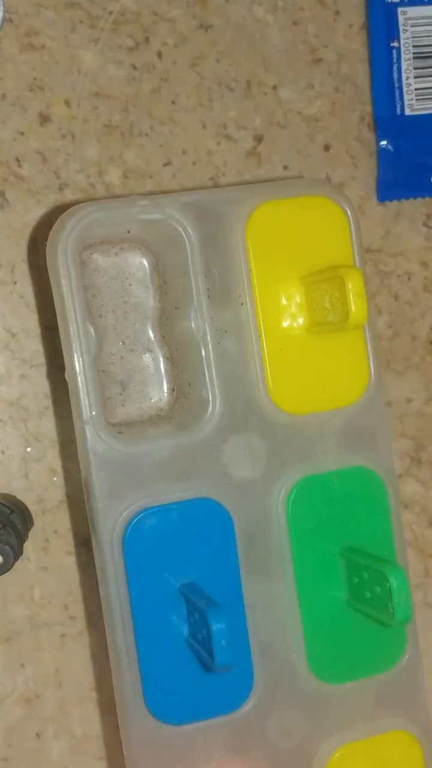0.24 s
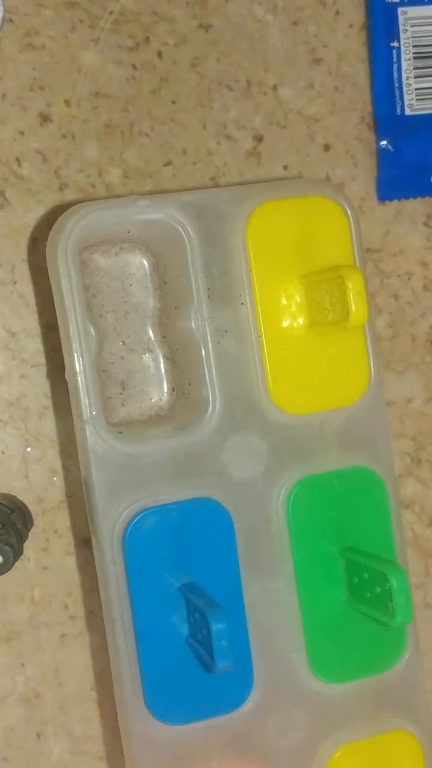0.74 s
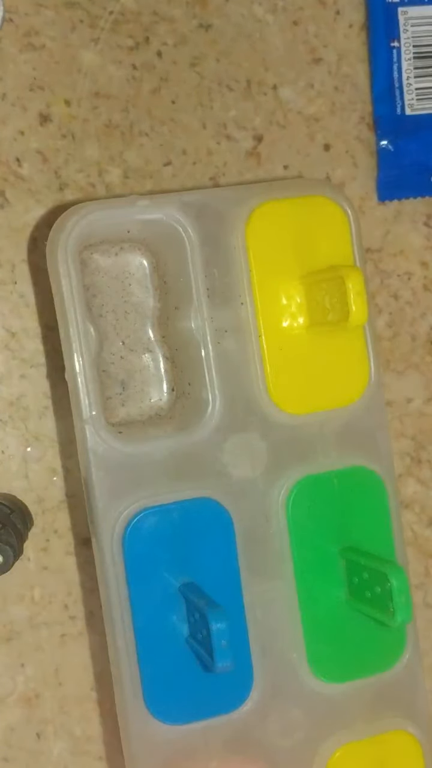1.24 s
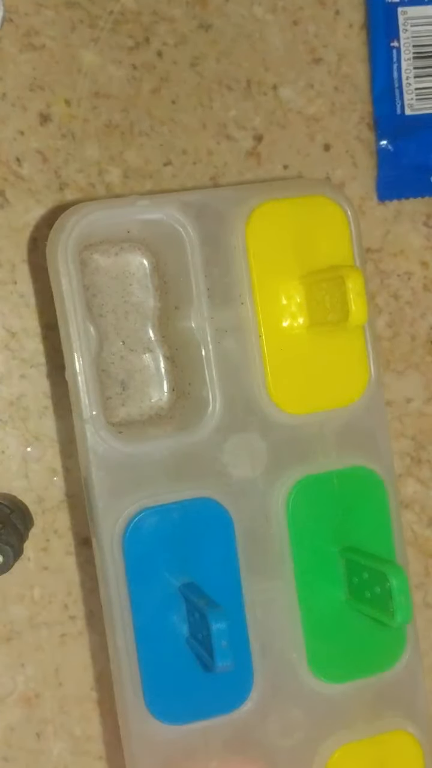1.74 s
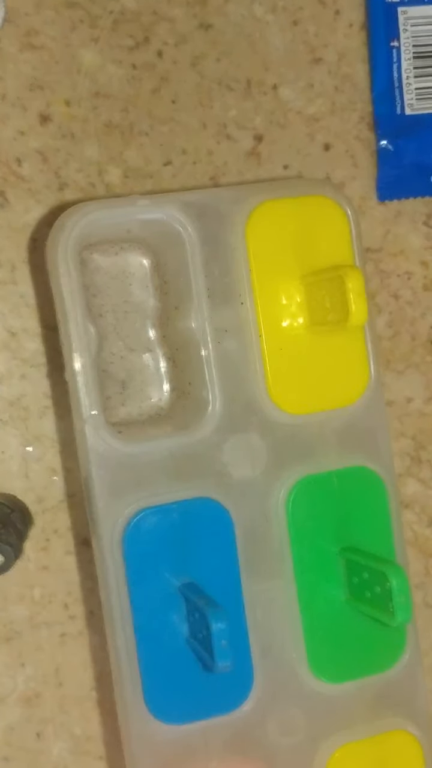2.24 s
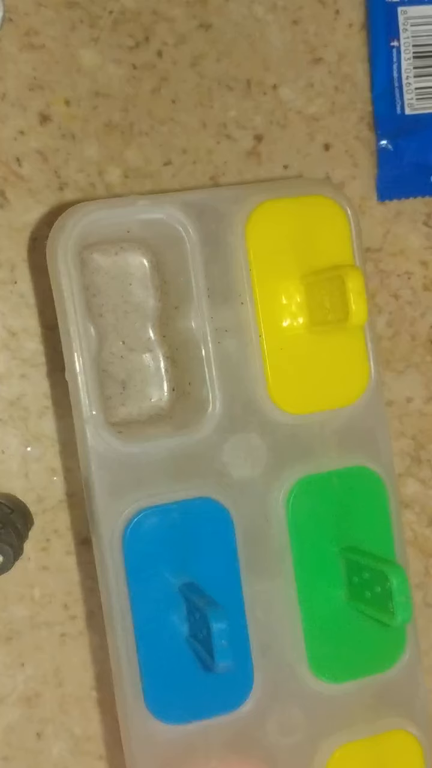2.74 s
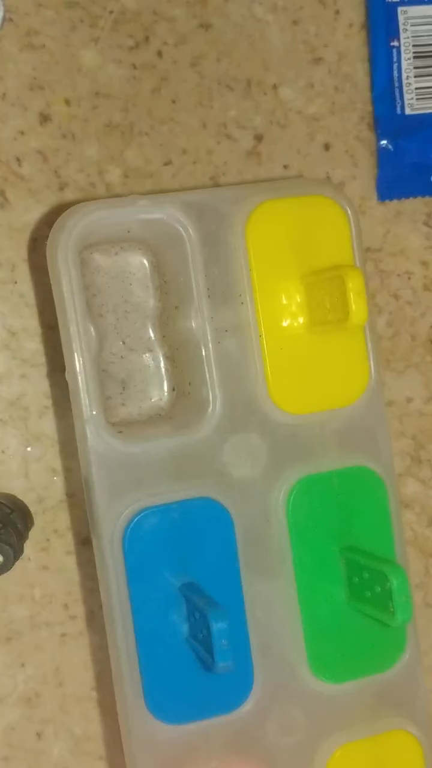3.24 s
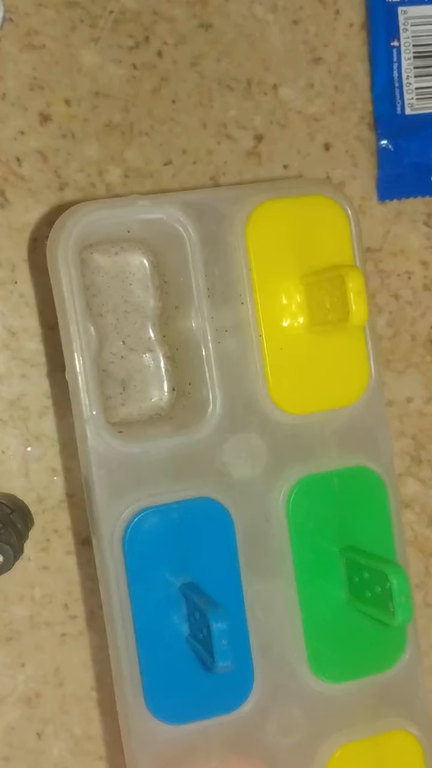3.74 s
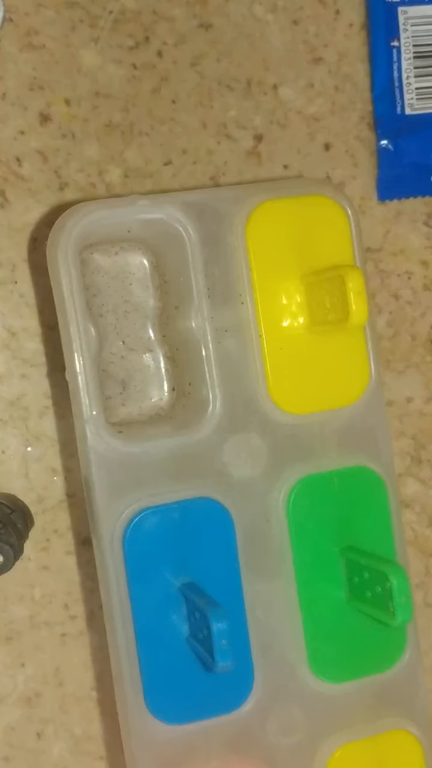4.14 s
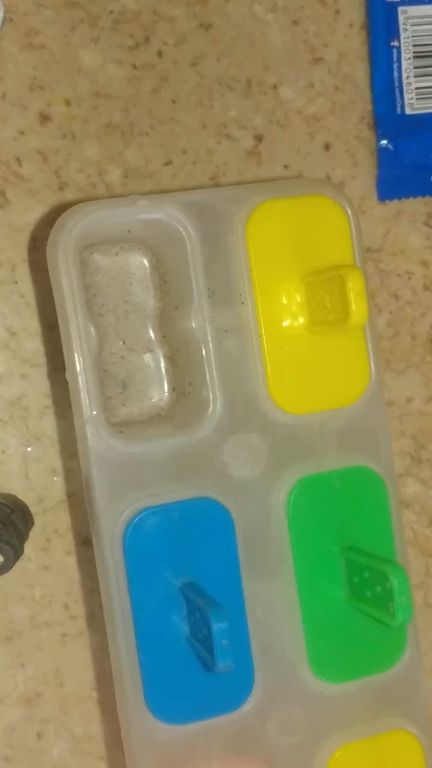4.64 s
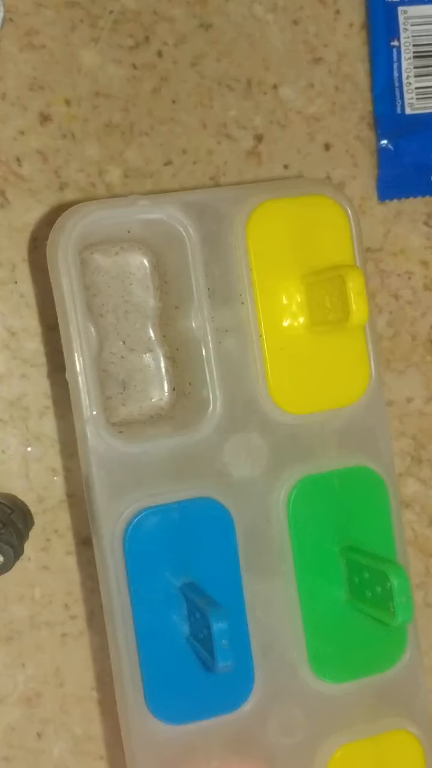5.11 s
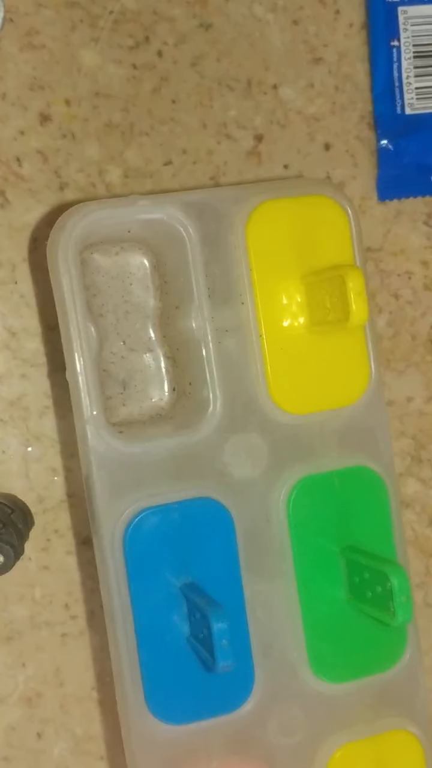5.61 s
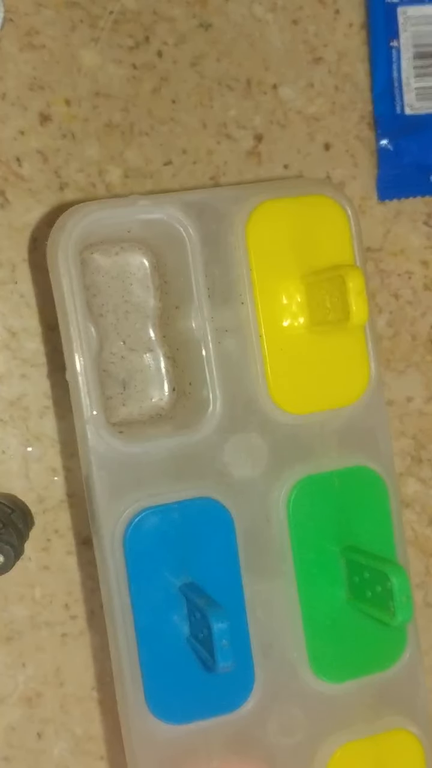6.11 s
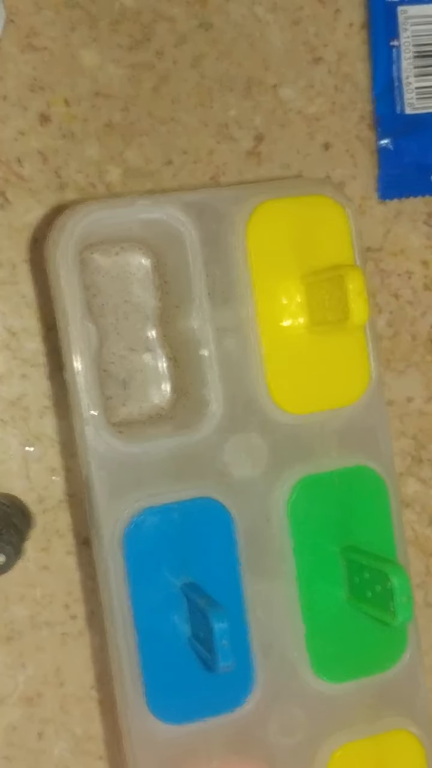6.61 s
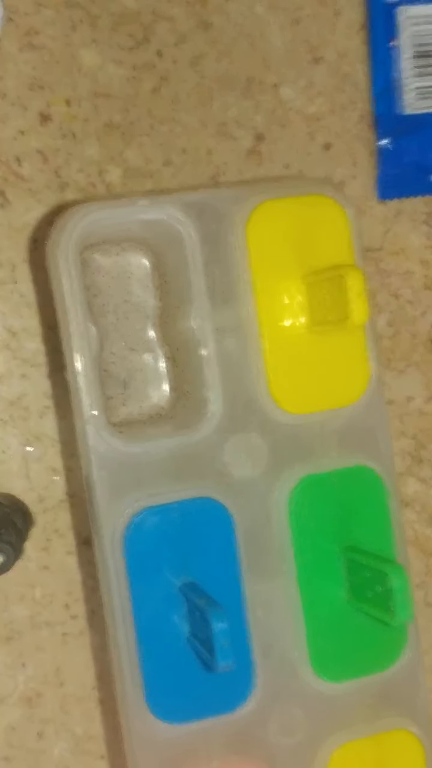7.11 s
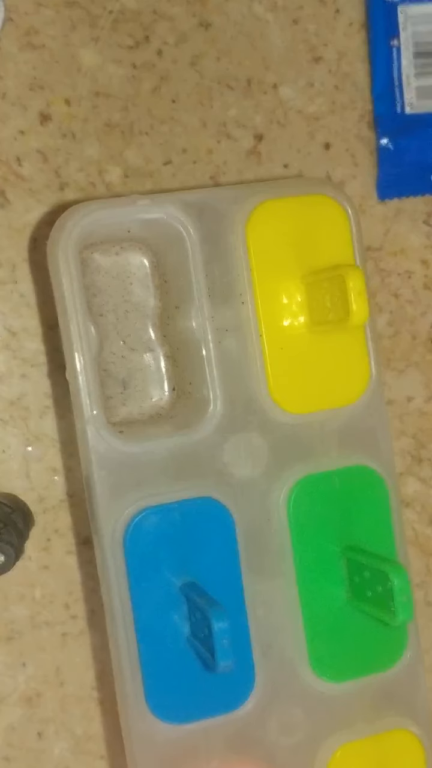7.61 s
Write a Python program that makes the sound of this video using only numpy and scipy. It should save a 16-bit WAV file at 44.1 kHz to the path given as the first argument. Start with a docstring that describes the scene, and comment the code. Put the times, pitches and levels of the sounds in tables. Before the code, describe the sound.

Close stereo pickup in a small, hard kitchen with a faint low hum. A plastic wrapper crackles for just over a second, then a wooden rolling pin beats the packet of biscuits about four times a second. Each blow is a sharp crunch with a knock and a low counter boom. A brief crinkly pause comes before four seconds, then harder, woodier blows run to the end.

```python
"""Crushing biscuits with a rolling pin

A packet of biscuits on a kitchen counter is beaten about four times a second, with one pause.
Each blow is a swarm of fractures, then a boom of counter modes and a knock of wood on worktop.
As the biscuits turn to crumbs they cushion less, and the pin tends to knock harder.
Runs of tiny clicks through short resonances make the wrapper rustle and snap; the small hard room
answers with decaying noise, over a faint background hum.
"""
import sys
import numpy as np
from scipy import signal
from scipy.fft import rfft, irfft
from scipy.io import wavfile

SR = 44100
rng = np.random.default_rng(int(sys.argv[2]) if len(sys.argv) > 2 else 0)


def unload_wav(signal):
    """Save mono or channel-first audio to the path in sys.argv[1] as 16-bit WAV at rate SR, clipped to [-1, 1]."""
    wavfile.write(
        sys.argv[1],
        SR,
        np.round(np.clip(np.atleast_2d(signal).T, -1, 1) * 32767).astype(np.int16),
    )


N = 346792
RING_S = np.arange(SR) / SR   # time axis of one second
BURST = SR // 4   # samples in a short burst
FREQS = np.fft.rfftfreq(SR, 1 / SR)   # Hz

# blows of the pin, levels relative within each layer:
# start_s, crunch_db, treble_db (wrapper), crack_hz (centre), knock_db (wood)
BLOWS = [(1.251, 9, 15.5, 1750, -13.5), (1.4686, 10, 11.5, 1560, 11.5), (1.685, 13.5, 14.5, 1680, 13.5),
         (1.8824, 12.5, 11, 2480, 4), (2.078, 7.5, 15, 3000, 1.5), (2.2956, 16, 13.5, 2840, 12),
         (2.5538, 15, 14.5, 2970, 19), (2.826, 9, 15, 1350, 17), (3.122, 14.5, 12.5, 2270, 6.5),
         (3.8535, 17, 18, 1930, 17.5), (4.128, 16, 15.5, 3820, 16), (4.377, 14, 12.5, 1300, 15),
         (4.59, 16, 13, 2600, 12), (4.798, 9.5, 13, 2780, 12), (5.04, 17, 13.5, 1980, 18.5),
         (5.309, 14.5, 10, 3000, 23), (5.582, 15, 15.5, 3000, 20), (5.873, 9, 15, 1300, 15.5),
         (6.152, 15.5, 10.5, 1360, 21), (6.426, 9, 13, 1330, 22), (6.684, 15, 14.5, 1440, 17.5),
         (6.929, 7.5, 13, 1510, 19), (7.1793, 13, 10.5, 1350, 23), (7.428, 14.5, 14, 1370, 21.5),
         (7.6576, 6.5, 2.5, 1370, 4)]
# reverberation time of the kitchen: frequency_hz, t60_s
KITCHEN_DECAY = [(150, 0.83), (500, 0.65), (1500, 0.53), (4000, 0.45), (9000, 0.3), (16000, 0.24)]
# the less the biscuits cushion a blow, the louder its knock;
# squeeze length, knock pitch and thump follow from that
USUAL_KNOCK_DB = 16


def from_db(db):
    """Level to amplitude ratio: 20 dB is a factor of ten."""
    return 10 ** (np.asarray(db) / 20)


def unit(x):
    """Energy normalisation: the channels average an energy of 1."""
    return x / np.sqrt(np.mean(np.sum(x ** 2, axis=-1)) + 1e-20)


def at_hz(points, hz):
    """Interpolation on a logarithmic frequency axis, where octaves are equally wide."""
    f, value = np.transpose(points)
    return np.interp(np.log(np.maximum(hz, 1)), np.log(f), value)


def add(out, s, sound):
    """Superposition: a sound is summed in from its starting time in seconds."""
    i = int(np.clip(round(s * SR), 0, N - 1))
    out[..., i:i + sound.shape[-1]] += sound[..., :N - i]


def through(x, response):
    """Linear filtering: convolution with an impulse response, kept to the input's length."""
    return signal.fftconvolve(np.atleast_2d(x), np.atleast_2d(response), axes=-1)[:, :x.shape[-1]]


def one_band(x, hz, kind, order=2):
    """Butterworth filtering: a maximally flat low- or high-pass."""
    sos = signal.butter(order, min(hz, SR / 2 - 1), kind, fs=SR, output="sos")
    return signal.sosfilt(sos, x + 1e-18)


def colour(points):
    """Minimum phase: folding the cepstrum gives a causal response with the given spectrum."""
    cepstrum = irfft(np.log(from_db(at_hz(points, FREQS))), SR)
    cepstrum[1:SR // 2] *= 2
    cepstrum[SR // 2 + 1:] = 0
    return unit(irfft(np.exp(rfft(cepstrum)), SR))


def dying(t60):
    """Exponential damping: the amplitude falls 60 dB in t60 seconds."""
    return np.exp(-np.log(1000) * RING_S / t60)


def ring(modes):
    """Modal synthesis: a struck body sounds as a sum of damped sines."""
    return sum(from_db(db) * np.sin(2 * np.pi * hz * RING_S) * dying(t60) for hz, db, t60 in modes)


def ringing(x, hz, width_hz, lift_db):
    """Resonance: a piece or crease adds its own short ringing to a burst."""
    b, a = signal.iirpeak(hz, hz / width_hz, fs=SR)
    return x + from_db(lift_db) * signal.lfilter(b, a, x + 1e-18)


def two_ears(size, side_db):
    """Stereo decorrelation: white noise with a chosen level of difference between the channels."""
    mid, side = rng.standard_normal((2, size))
    return mid + from_db(side_db) * side * [[1], [-1]]


def grains(size, per_s, spread_db):
    """Random point process: tiny fractures of uneven size at random moments, rms 1."""
    born = rng.random(size) < per_s / SR
    sizes = from_db(spread_db * np.clip(rng.standard_normal(size), -2, 2))
    clicks = born * rng.choice([-1, 1], size) * sizes
    return unit(clicks) * np.sqrt(size)


def kitchen(side_db, build_s):
    """Diffuse reverberation: it builds up briefly and each octave dies at its own pace."""
    noise = rfft(two_ears(SR, side_db))
    centres = 125 * 2. ** np.arange(8)   # Hz
    tail = 0
    for hz, row in zip(centres, np.eye(len(centres))):
        share = at_hz(np.c_[centres, row], FREQS)   # overlapping octaves that sum to 1
        tail = tail + irfft(noise * share, SR) * dying(at_hz(KITCHEN_DECAY, hz))
    return unit(tail * (1 - np.exp(-RING_S / build_s)))


def background():
    """Steady noise: a coloured hum, and low room resonances that drone faintly under random drive."""
    # background of the kitchen: frequency_hz, level_db (per Hz)
    hum_colour = [(15, -36), (25, 10), (55, 28), (134, 29), (229, 17.5), (1290, 5.5), (2990, -43),
                  (5280, -64.5), (6920, -85), (9070, -58), (10700, -63), (13600, -44.5), (16000, -7)]
    hum = unit(through(two_ears(N, side_db=-14), colour(hum_colour))) * np.sqrt(N)
    room_modes = ring([(56, 0, .3), (124, -1, .2), (165, -2, .15)])
    drone = unit(through(two_ears(N, side_db=-12), room_modes)) * np.sqrt(N)
    return from_db(-53.5) * hum + from_db(-56) * drone


def rustle(attack_s=0.012, release_t60=0.084, lift_db=-2):
    """Friction and buckling: while the hand grips or shifts the packet, creases flip in dense clicks."""
    # grips: start_s, hold_s, level_db (relative), centre_hz
    grips = [(0, 0.005, -34, 3020), (0.301, 0.068, -46.5, 4500), (0.381, 0.14, -41, 4500),
             (0.687, 0.09, -45, 2500), (.8, 0.094, -43.5, 3350), (0.992, .04, -49, 3800),
             (3.202, 0.17, -34.5, 2680), (3.35, 0.14, -40, 3130), (3.827, .025, -47, 4000)]
    out = np.zeros((2, N))
    for s, hold_s, db, hz in grips:
        attack = np.minimum(RING_S / attack_s, 1)
        release = from_db(-60 * np.maximum(RING_S - hold_s, 0) / release_t60)
        ticks = np.array([grains(SR, per_s=200, spread_db=7) for ear in "LR"])
        creases = ticks + grains(SR, per_s=2200, spread_db=1.5)   # sparse per ear, dense in the middle
        add(out, s, from_db(db) * attack * release * ringing(creases, hz, width_hz=1300, lift_db=lift_db))
    return out


def snaps(snap_t60=0.052, lift_s=0.1, lift_spread_s=.02, lift_db=-2.5):
    """Snap-through buckling: each sudden flip of the wrapper is a quick, dying run of clicks."""
    # snaps in the hand or under the pin: start_s, level_db (relative), centre_hz
    loud_snaps = [(0.113, -5, 5300), (0.14, -13, 5200), (0.299, -12.5, 8000), (0.4, -8.5, 5100),
                  (0.5, -2, 3180), (0.569, -7.5, 2460), (0.644, -13, 5620), (0.693, -8.5, 1600),
                  (0.705, -4, 4360), (1.03, -17, 8800), (1.042, -5, 8400), (1.092, -13.5, 8300),
                  (1.763, -1, 2380), (1.803, -2, 1680), (2.9685, -5, 3010), (3.31, 6, 1670),
                  (3.386, 0, 1100), (3.432, -1, 3130), (3.528, -3.5, 4800), (3.5655, -5, 4050),
                  (3.5955, -5.5, 3800), (3.618, -1, 3700), (3.641, -6, 2800), (4.2526, -1, 3790),
                  (4.4524, 7, 2500), (4.9137, -2, 1560), (5.4236, -3, 1570), (5.7526, -1, 3750),
                  (6.283, 4, 1000), (6.819, 1.5, 2440), (7.053, -1, 2470)]
    out = np.zeros((2, N))
    # the wrapper also springs back as the pin lifts off
    lifts = [(s + lift_s + lift_spread_s * rng.uniform(-1.1, 1), lift_db, rng.uniform(1000, 3200))
             for s, *_ in BLOWS]
    for s, db, hz in lifts + list(loud_snaps):
        run = grains(BURST, per_s=2500, spread_db=4) + from_db(-4) * two_ears(BURST, side_db=-3)
        run = ringing(run * dying(snap_t60)[:BURST], hz, width_hz=1100, lift_db=5)
        add(out, s, from_db(db) * unit(run))
    return out


def wrapper(body_db=-10):
    """Thin-film radiation: rustle and snaps sound mostly in the treble, with a weaker low body."""
    creasing = rustle() + snaps()
    return one_band(creasing, 1190, "high") + from_db(body_db) * one_band(creasing, 530, "low")


def crunch(rise_share=0.68, crack_db=-6, crack_lift_db=6):
    """Brittle fracture: biscuits and wrapper collapse within milliseconds in a swarm of tiny breaks."""
    squeeze_s, squeeze_halves_db = 0.0054, 34   # a harder knock ends the squeeze sooner
    out = np.zeros((2, N))
    for s, crunch_db, treble_db, crack_hz, knock_db in BLOWS:
        length_s = squeeze_s * 2 ** ((USUAL_KNOCK_DB - knock_db) / squeeze_halves_db)
        age = RING_S[:BURST] / (rise_share * length_s)
        squeeze = age ** 2 * np.exp(-2 * age)   # greatest at age 1
        swarm = grains(BURST, per_s=9000, spread_db=3) + from_db(-4) * two_ears(BURST, side_db=0)
        # the larger pieces break early in the squeeze, at a pitch set by their size
        pieces = one_band(one_band(two_ears(BURST, side_db=-10.5), 3100, "low"), 1450, "high")
        early = pieces * squeeze * np.exp(-age / 2)
        crack = unit(ringing(early, crack_hz, width_hz=470, lift_db=crack_lift_db))
        sound = unit(swarm * squeeze) + from_db(crack_db) * crack
        dull = one_band(sound, 3400, "low", order=1)
        add(out, s, from_db(crunch_db) * dull + from_db(treble_db) * (sound - dull))
    return out


def crumbs(below_crunch_db=11.0, settle_t60=0.31):
    """Relaxation after loading: loosened pieces crack and shift after a blow, muffled by the wrapper."""
    out = np.zeros((2, N))
    for s, crunch_db, *_ in BLOWS:
        for hz in rng.uniform(1400, 5000, 3):
            clicks = grains(BURST, per_s=50, spread_db=3) * dying(settle_t60)[:BURST]
            tick = two_ears(BURST, side_db=-3) * dying(.01)[:BURST]
            piece = ringing(through(clicks, tick), hz, width_hz=600, lift_db=6)
            add(out, s + 0.011, from_db(crunch_db - below_crunch_db) * unit(piece))
    return one_band(out, 6000, "low", order=1)


def packet(wrapper_wet_db=-1, walls_db=-5, wash_db=-2, worktop_db=-11, worktop_t60=0.024):
    """Direct and reverberant field: crackle arrives straight, off near walls, and as a wash of its energy."""
    # crackle at each microphone port: frequency_hz, level_db (per Hz)
    left_colour = [(150, -18.5), (500, -3.5), (1000, 0), (1500, -1), (2800, -0.5), (4000, -0.5), (6000, 0),
                   (7100, -3.5), (8200, 4), (9300, 5.5), (10100, -6), (10800, -15), (11800, -7.5),
                   (15500, -9)]
    right_colour = [(150, 2.5), (500, -0.5), (1000, 2), (1500, 2), (2800, 0.5), (4000, 0), (6000, -2),
                    (7100, -9), (8200, -10.5), (9300, -4.5), (10400, -23), (10900, -8.5), (11800, -1),
                    (13000, 1), (15500, -4)]
    creasing = wrapper()
    blows = crunch()
    light = creasing + crumbs()
    sent = blows + from_db(wrapper_wet_db) * light
    heard = blows + light + from_db(walls_db) * through(sent, kitchen(side_db=0.5, build_s=0.0034))
    edges = [300, 1200, 1700, 2400, 3400, 4800, 9600, 17000]   # Hz
    worktop = from_db(worktop_db) * unit(dying(worktop_t60))
    for low, high in zip(edges, edges[1:]):
        band = signal.butter(2, [low, high], "band", fs=SR, output="sos")
        power = np.mean(signal.sosfilt(band, sent) ** 2, axis=0)
        room = from_db(wash_db) * unit(dying(at_hz(KITCHEN_DECAY, np.sqrt(low * high))))
        # energies add, so the squared decays smear the band's power in time
        lingering = through(power, room ** 2 + worktop ** 2)
        noise = unit(signal.sosfilt(band, two_ears(N, side_db=1.5)))
        heard += np.sqrt(np.maximum(lingering, 0) * N) * noise
    return through(heard, np.array([colour(left_colour), from_db(-3.0) * colour(right_colour)]))


def knock(modes_db=-4, room_db=-1, clack_db=-4, clack_t60=0.082, spot_db=2):
    """Impact stiffness: wood meets worktop through the crumbs; a thinner cushion gives a higher knock."""
    # the pin comes down on the bare worktop and bounces: start_s, level_db (relative), centre_hz
    bounces = [(7.661, 22, 724), (7.706, 12, 620), (7.729, 20, 660)]
    # pin against the worktop: frequency_hz, level_db (relative), t60_s
    knock_modes = [(296.3, -0.5, 0.29), (327.6, 1, 0.32), (366.4, -2, 0.63), (390.4, -4.5, 0.41),
                   (490.4, -19, 1), (567, 7, 0.062), (561, -11, 0.73), (702, -10, 0.69), (861, -20, 0.57),
                   (990, -36, 0.21), (1260, -25, 0.12)]
    # clack of the pin: frequency_hz, level_db (per Hz)
    clack_colour = [(100, -18.5), (200, 3), (350, 0.5), (470, -8), (570, -7.5), (800, -8), (1200, -12),
                    (2000, -22.5), (4000, -30.5)]
    delay_s = 0.002997   # after the pin first touches the wrapper
    usual_hz, octave_db = 439, 31   # a louder knock sounds higher
    out, tone = np.zeros((2, N)), colour(clack_colour)
    room = unit(through(kitchen(side_db=-3.5, build_s=0.012), tone))
    blows = [(s + delay_s, db, usual_hz * 2 ** ((db - USUAL_KNOCK_DB) / octave_db)) for s, *_, db in BLOWS]
    for s, db, centre_hz in blows + list(bounces):
        # every blow lands on another spot and favours other modes
        spot_modes = [(hz, level + rng.normal(0, spot_db), t60) for hz, level, t60 in knock_modes]
        body = unit(ring(spot_modes))
        clack = unit(through(two_ears(SR, side_db=0) * dying(clack_t60), tone))
        sound = from_db(modes_db) * body + from_db(room_db) * room + from_db(clack_db) * clack
        sound = one_band(one_band(sound, 1.46 * centre_hz, "low", order=1), 0.7 * centre_hz, "high")
        add(out, s, from_db(db) * unit(sound))
    return out * from_db([[-.8], [.8]])   # channel gains of -0.8 dB and +0.8 dB


def thump(room_db=-13, cushion_hz=660, db_per_octave=10):
    """Forced modes: once the packet is squashed the counter booms; a cushion dulls and weakens it."""
    # counter and cupboard below it: frequency_hz, level_db (relative), t60_s
    thump_modes = [(55.2, -19, 0.91), (70.3, -11.5, 0.29), (82.5, -12.5, 0.4), (121.5, -19.5, 0.98),
                   (160.26, 1.5, 0.27), (181.36, -5.5, 0.69), (205.7, -7, 0.43), (243.1, -13.5, 0.4),
                   (262.8, -19, 0.3), (304.8, -23, 0.43)]
    # early reflections of the thump: delay_s, gain
    thump_echoes = [(0, 0.93), (.0053, -1.19), (0.0123, 0.74), (0.0241, 0.46), (0.0566, -.24), (.071, 0.37),
                    (0.0862, -0.16)]
    delay_s, usual_db = .0066, 22.5   # delay after the pin first touches the wrapper
    full_knock_db, fall = 13.5, 0.45   # below this knock the thump weakens too (dB per dB)
    sag = 0.23   # above the usual knock, the blow is too brief to push the counter fully (dB per dB)
    out, boom = np.zeros((2, N)), np.zeros(N)
    body = ring(thump_modes)
    for echo_s, gain in thump_echoes:
        add(boom, echo_s, gain * body)
    wash = one_band(kitchen(side_db=-6.0, build_s=0.0026), 216.8, "low", order=3)
    boom = unit(boom[:SR]) + from_db(room_db) * unit(one_band(wash, 70, "high"))
    for s, *_, knock_db in BLOWS:
        corner_hz = cushion_hz * 2 ** ((knock_db - USUAL_KNOCK_DB) / db_per_octave)
        cushioned = one_band(boom, corner_hz, "low", order=1)
        level_db = usual_db - fall * max(full_knock_db - knock_db, 0)
        level_db -= sag * max(knock_db - USUAL_KNOCK_DB, 0)
        add(out, s + delay_s, -from_db(level_db) * unit(cushioned))
    return one_band(out, 60, "high", order=3) * from_db([[1], [-1]])   # channel gains of +1 dB and -1 dB


def scene():
    """Superposition of the kitchen background, the packet, the wooden knock and the counter's thump."""
    return background() + packet() + knock() + thump()


def record(dry):
    """Saturation and band-limiting: the loudest peaks are rounded and the top is cut."""
    rounded = dry / (1 + dry ** 4) ** (1 / 4)
    cutoff_hz = 15900
    return signal.sosfilt(signal.ellip(10, .2, 70, cutoff_hz, fs=SR, output="sos"), rounded)


dry = scene()
out = record(dry)
unload_wav(out)
```